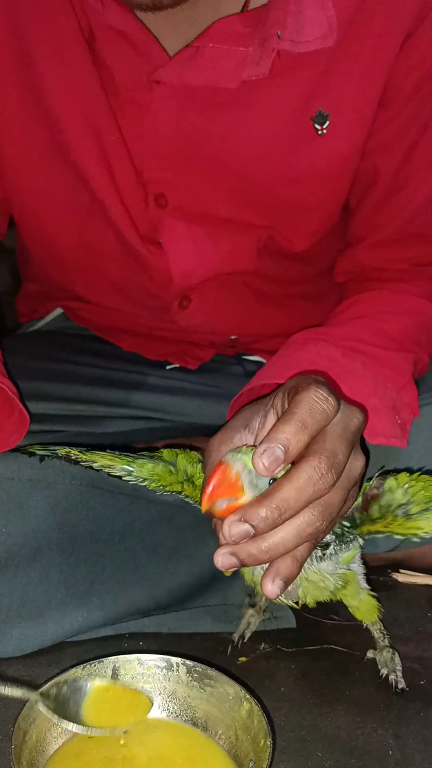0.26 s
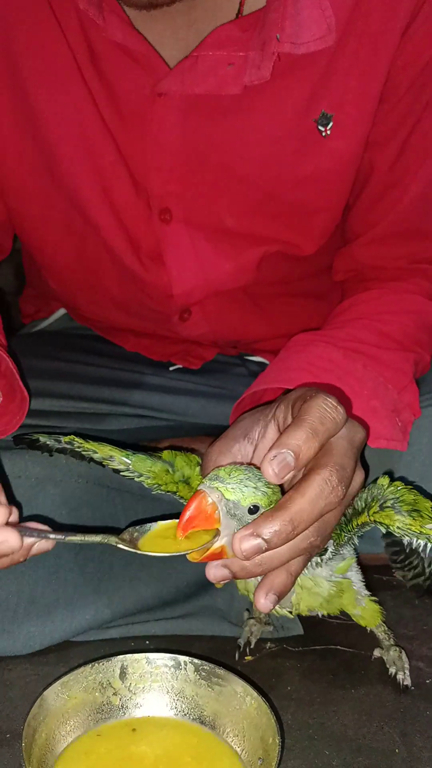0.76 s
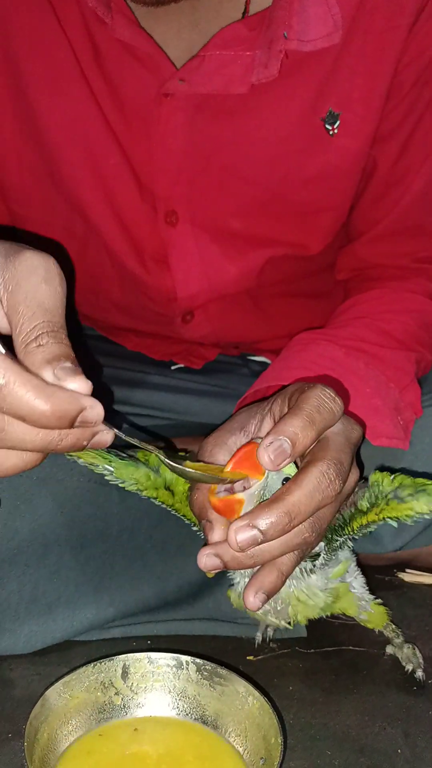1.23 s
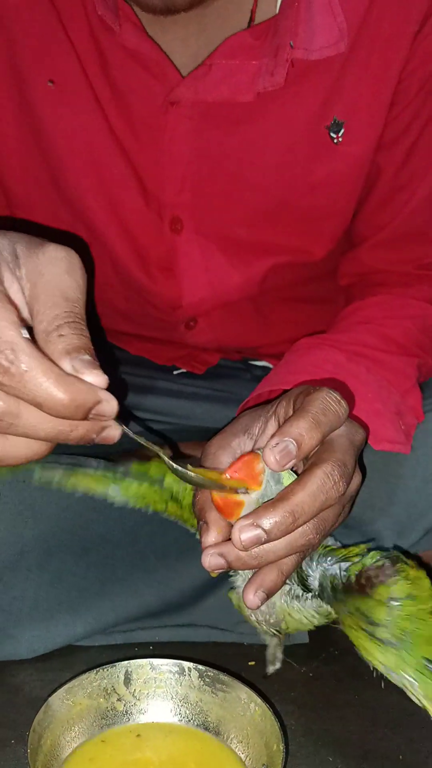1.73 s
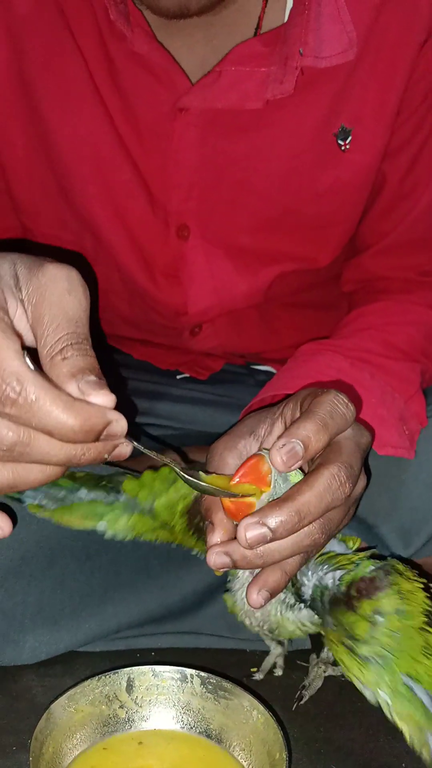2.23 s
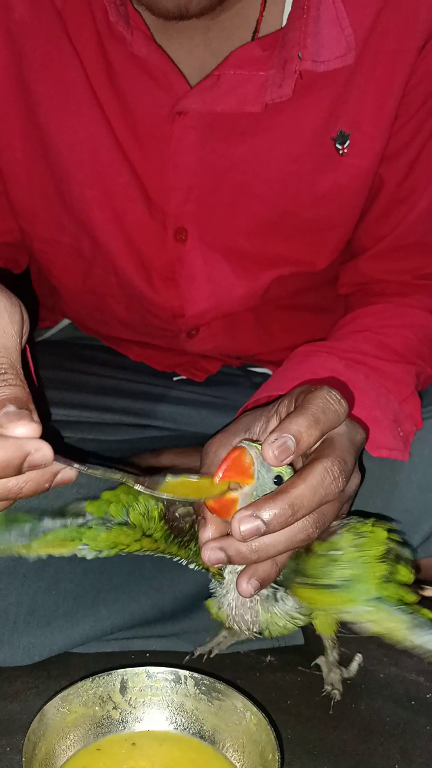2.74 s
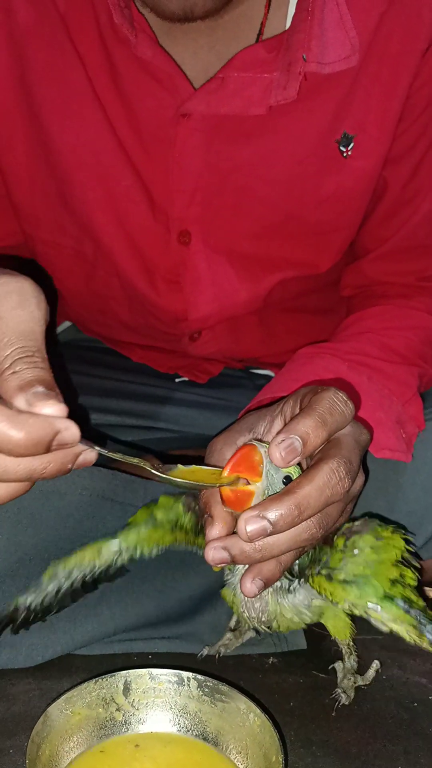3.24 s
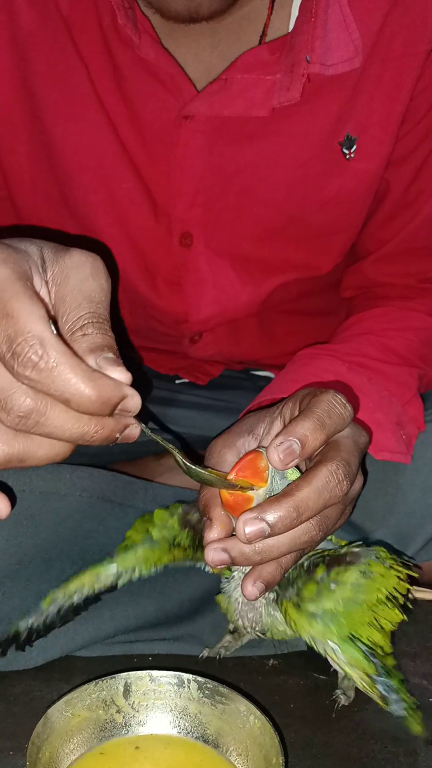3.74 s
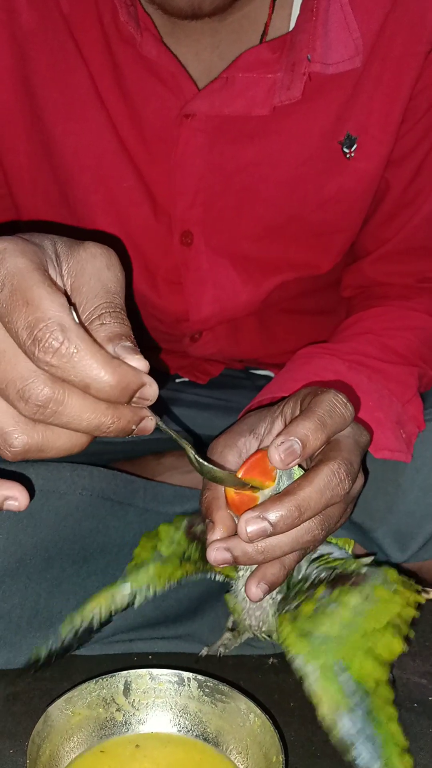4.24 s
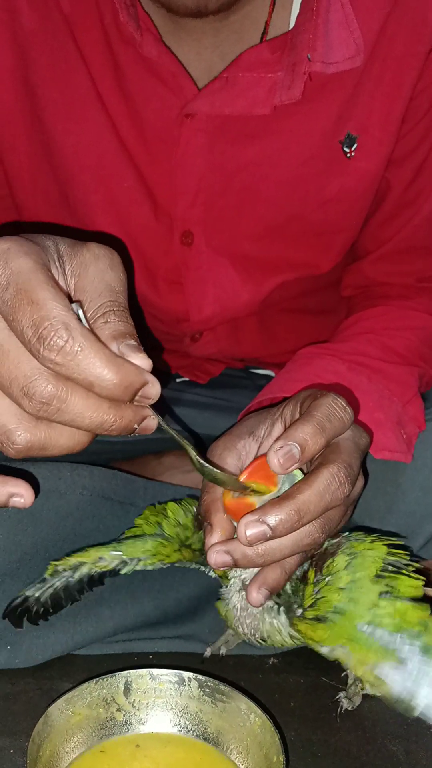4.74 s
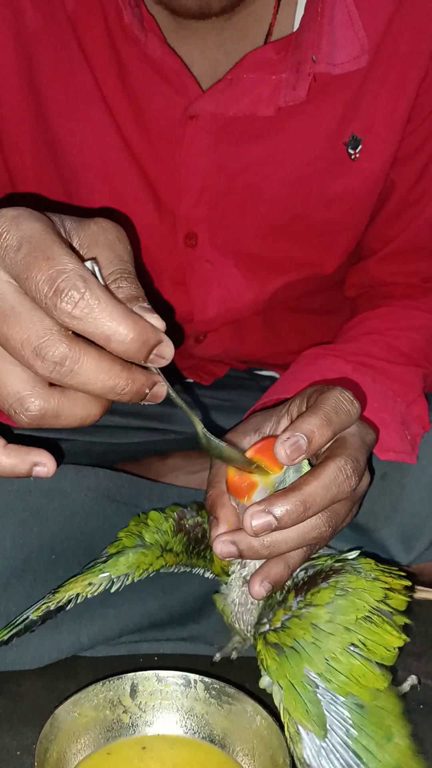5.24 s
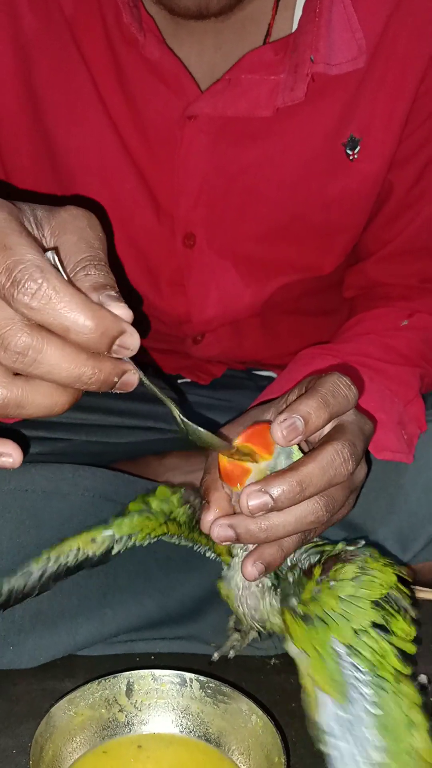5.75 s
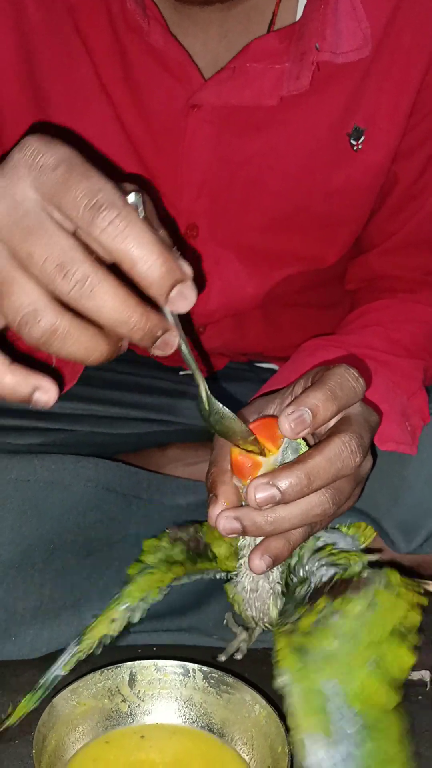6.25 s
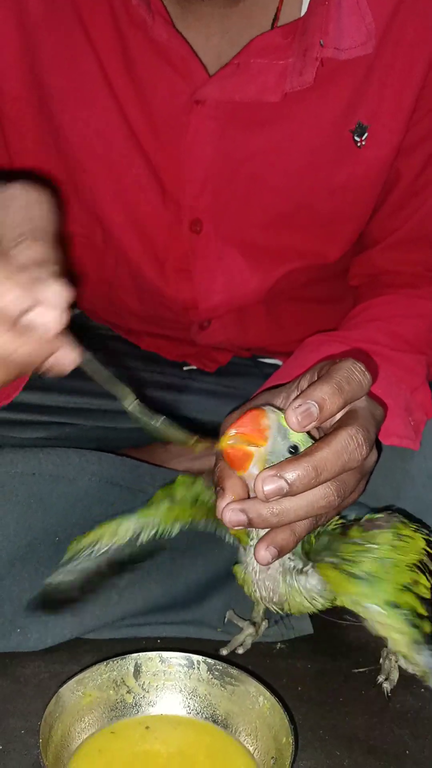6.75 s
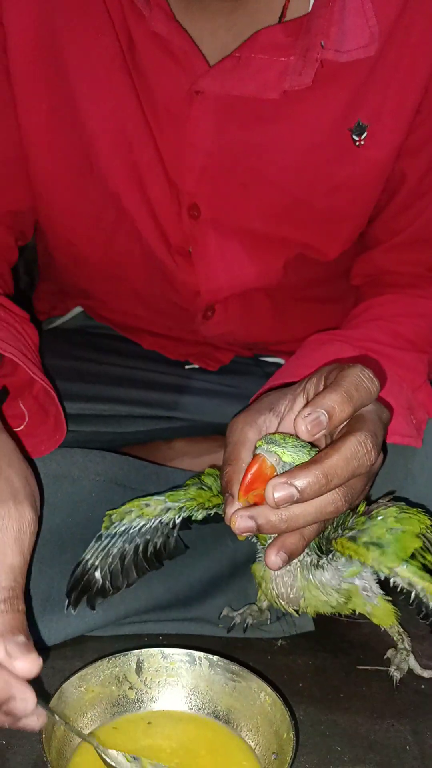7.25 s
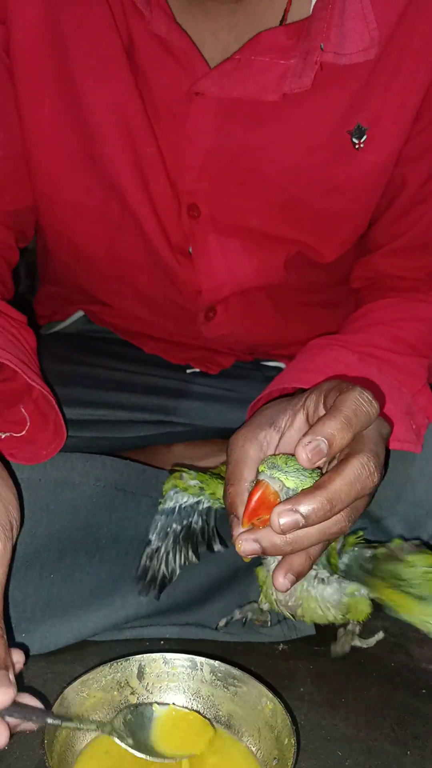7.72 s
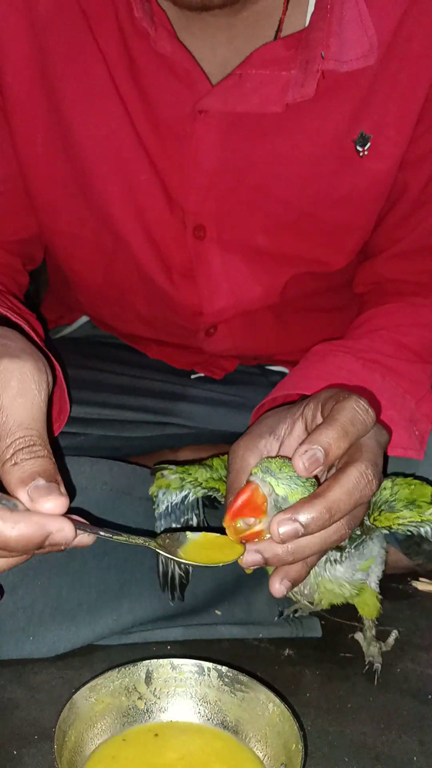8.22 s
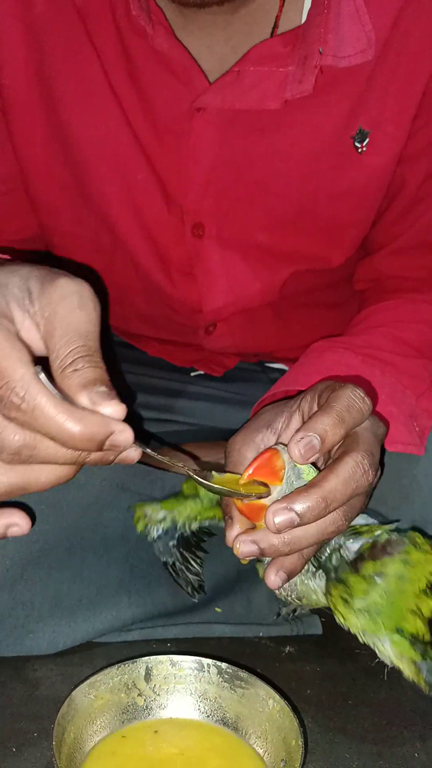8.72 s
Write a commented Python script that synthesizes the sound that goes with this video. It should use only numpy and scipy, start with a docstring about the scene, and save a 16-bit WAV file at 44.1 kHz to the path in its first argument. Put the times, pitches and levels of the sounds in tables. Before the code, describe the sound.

A young parrot gives two harsh begging cries in a quiet room, amid light spoon ticks and soft feather rustling.

```python
"""A parrot chick held in a hand begs twice in a quiet room, close to a stereo microphone.
Its vocal folds buzz, and its throat and beak shape the buzz: first a clear, falling, trembling cry,
then a cry that breaks into a rasp as the folds lose their beat. Around the cries feathers and cloth
rustle, dull taps land on the floor, beak and claws tick, and a spoon rings and scrapes on a bowl.
A low hum, a soft hiss and a few faint faraway tones lie underneath."""
import sys
import numpy as np
from scipy import signal
from scipy.fft import irfft
from scipy.io import wavfile
from scipy.ndimage import uniform_filter1d

SR = 44100
rng = np.random.default_rng(int(sys.argv[2]) if len(sys.argv) > 2 else 0)


def unload_audio(sound):
    """Save the sound as a 16-bit wav file, at the path given as the first command line argument."""
    columns = np.transpose(np.atleast_2d(sound))
    # keep every value between -1 and 1, then stretch to whole-number steps
    steps = np.round(np.clip(columns, -1, 1) * 32767)
    wavfile.write(sys.argv[1], SR, steps.astype(np.int16))


N = 396018


def gain_of(db):
    """Turns decibels into a number to multiply by."""
    return 10 ** (np.asarray(db) / 20)


def evened(x):
    """Scales a signal to an average power of 1."""
    return x / np.sqrt(np.mean(x ** 2) + 1e-20)


def curve_at(points, hz):
    """Joins (freq_hz, value) points with straight lines on an octave scale."""
    point_hz, value = np.transpose(points)
    return np.interp(np.log(hz + 1), np.log(point_hz + 1), value)


def humps(peaks, hz):
    """The boost or cut in dB that resonances give at each frequency."""
    return sum(db / (1 + (2 * (hz - centre) / width) ** 2) for centre, width, db in peaks)


def add(mix, start_s, sound):
    """Adds a sound into the mix at a given time."""
    part = mix[..., round(start_s * SR):][..., :sound.shape[-1]]
    part += sound[..., :part.shape[-1]]


def wander(count, span_s):
    """A smooth random wiggle of size about 1; a longer span makes it slower."""
    memory = np.exp(-1 / (span_s * SR))
    return evened(signal.lfilter([1], [1, -2 * memory, memory ** 2], rng.standard_normal(count)))


# How alike left and right noise are (1 = the same): freq_hz, likeness
LIKENESS = [(60, 0.99), (180, 0.96), (550, -0.017), (1650, 0.21), (4970, -0.15), (15000, -0.4)]
def stereo_noise(shape, peaks, size, patch_db):
    """Shaped noise with random louder and softer patches; left and right agree only in the bass."""
    hop, hz = size // 4, np.fft.rfftfreq(size, 1 / SR)
    draws = rng.standard_normal((N // hop + 5, len(hz), 5), dtype=np.float32)
    a, b, c, d, patches = np.ascontiguousarray(draws.T)
    patches = evened(uniform_filter1d(uniform_filter1d(patches, size=8, axis=0), size=8, axis=1))
    alike = curve_at(LIKENESS, hz)[:, None]
    left = a + 1j * b
    right = alike * left + np.sqrt(1 - alike ** 2) * (c + 1j * d)
    colour_db = curve_at(shape, hz) + humps(peaks, hz)
    spectra = np.array([left, right]) * gain_of(colour_db[:, None] + patch_db * patches)
    return evened(signal.istft(spectra, nperseg=size, noverlap=size - hop)[1][:, :N])


# Tone colour of the room's background: freq_hz, gain_db
AIR_COLOUR = [(12, -33.5), (20, -0.5), (42, -10.5), (98, -1), (276, -23), (335, -13), (407, -17),
              (619, -22), (1280, -30), (3590, -29.5), (5310, -33.5), (6100, -27.5), (6640, -34),
              (14500, -39), (15800, -37)]
# Narrow bands that stand out of it: freq_hz, width_hz, gain_db
AIR_PEAKS = [(24.2, 14, -6.5), (62.4, 10, 10), (98, 12, -1.5), (147, 13, 7.5), (200, 14, 8.5),
             (258, 16, 9.5), (335.8, 19, 13), (6230, 120, 2)]
def room_tone(level_db=-62.5, swell_at_s=2.7, swell_span_s=0.3, swell_db=5):
    """A low hum under a faint hiss; the deepest part swells once."""
    tone = gain_of(level_db) * stereo_noise(AIR_COLOUR, AIR_PEAKS, size=4096, patch_db=1.5)
    deep = signal.sosfiltfilt(signal.butter(4, 85, fs=SR, output="sos"), tone)
    swell = np.exp(-((np.arange(N) / SR - swell_at_s) / swell_span_s) ** 2)
    return tone + deep * (gain_of(swell_db * swell) - 1)


def rustle(moves, shape, peaks, rest_db, rise_share, flicker_db):
    """Flickering noise that swells with each move; it rises in rise_share times the fade time."""
    t = np.arange(0, N / SR + .01, .002)
    power = gain_of(2 * rest_db)
    for peak_s, fade_s, db in moves:
        span_s = fade_s * np.where(t < peak_s, rise_share, 1)
        power = power + gain_of(2 * db) * np.exp(-((t - peak_s) / span_s) ** 2)
    level_db = np.interp(np.arange(N) / SR, t, 10 * np.log10(power)) + flicker_db * wander(N, .005)
    return gain_of(level_db) * stereo_noise(shape, peaks, size=512, patch_db=2.5)


# Single moves of feathers, cloth and body: peak_s, fade_s, level_db
SWISHES = [(0.02, 0.061, -55.5), (0.073, 0.021, -61), (0.75, .2, -75), (0.96, 0.054, -69.5),
           (1.49, 0.064, -65.5), (1.618, 0.045, -66), (1.72, 0.03, -65.5), (1.839, 0.039, -63.5),
           (1.95, .25, -76), (1.96, 0.091, -67.5), (2.1, 0.05, -64), (2.87, 0.16, -67), (3.17, 0.1, -69),
           (3.55, .2, -82), (3.83, 0.24, -70.5), (3.99, 0.04, -68.5), (4.32, 0.057, -65.5), (4.55, .1, -68),
           (4.85, .15, -70.5), (5.1, 0.21, -70.5), (6.339, 0.054, -73), (6.69, .03, -74),
           (6.825, 0.057, -72.5), (7.15, 0.038, -91), (7.43, .09, -84), (7.72, 0.041, -68),
           (7.95, .15, -71.5), (8.34, .025, -78), (8.85, 0.044, -71), (8.975, 0.026, -74)]
RUBS = [(0.07, 0.02, -63), (0.65, 0.36, -68), (0.94, 0.081, -58.5), (1.84, 0.028, -72), (1.95, 0.081, -69),
        (3.8, 0.058, -74), (4.689, 0.083, -62.5), (6.62, .04, -77), (6.82, 0.033, -79),
        (8.341, 0.018, -67.5), (8.82, 0.017, -74), (8.97, 0.027, -75)]
BUMPS = [(0.05, 0.18, -65), (0.96, 0.17, -69), (1.84, 0.02, -67.5), (2.92, 0.034, -69), (4.0, 0.066, -68),
         (4.73, .09, -57.5), (6.85, .03, -82)]
# Tone colour of each kind of move: freq_hz, gain_db
FEATHER_COLOUR = [(900, -10.5), (2000, -9), (4000, -4), (6500, -4.5), (9000, -6), (11000, -18.5),
                  (15800, -12.5)]
CLOTH_COLOUR = [(250, -18.5), (450, 0.5), (750, -3), (1300, -10.5), (2500, -18.5), (4000, -40.5)]
BUMP_COLOUR = [(70, -12.5), (120, 0), (180, 3), (280, -11), (420, -35)]
# Resonances that make the rub sound hollow: freq_hz, width_hz, gain_db
CLOTH_PEAKS = [(450, 130, 3), (680, 80, 5), (1050, 90, 4)]
def movements():
    """Wing feathers swish, cloth rubs, and the chick's body bumps the lap."""
    feathers = rustle(SWISHES, FEATHER_COLOUR, (), rest_db=-83, rise_share=.82, flicker_db=2.5)
    cloth = rustle(RUBS, CLOTH_COLOUR, CLOTH_PEAKS, rest_db=-83.5, rise_share=.12, flicker_db=2.5)
    lap = rustle(BUMPS, BUMP_COLOUR, (), rest_db=-73, rise_share=.6, flicker_db=1.5)
    return feathers + cloth + lap


# Faint tones from afar: start_s, length_s, pitch_hz, level_db, waver_share (of the pitch)
FAR_TONES = [(0.08, .3, 440, -71, .01), (7.58, .45, 830, -80, .01), (7.66, .27, 4600, -74, .008)]
def far_tones():
    """Pure tones that fade in and out while their pitch wavers."""
    out, t = np.zeros(N), np.arange(SR // 2) / SR
    for start_s, length_s, hz, db, waver in FAR_TONES:
        progress = np.clip(t / length_s, 0, 1)
        cycles = np.cumsum(hz * (1 + waver * np.cos(3 * np.pi * progress))) / SR
        loudness = gain_of(db + 3 * wander(len(t), .012)) * np.sin(np.pi * progress)
        add(out, start_s, loudness * np.sin(2 * np.pi * cycles))
    return out


# Dull taps on the floor: start_s, level_db, pitch_hz
THUDS = [(0.9283, -62, 1050), (1.7294, -47, 454), (3.885, -59.5, 800), (4.581, -57.5, 990),
         (4.64, -57, 1010), (4.7002, -51.5, 757)]
def thuds(decay_s=0.029, snap_db=-10):
    """Each tap is a short tone plus a snap of noise. A decay_s is always the time to fall by 60 dB."""
    out, t = np.zeros((2, N)), np.arange(2500) / SR
    onset = np.clip(t / .0003, 0, 1)
    for start_s, db, hz in THUDS:
        snap = gain_of(snap_db - 60 * t / decay_s) * rng.standard_normal((2, len(t)))
        add(out, start_s, gain_of(db - 60 * t / decay_s) * onset * (np.sin(2 * np.pi * hz * t) + snap))
    return out


def pan(left_db):
    """Left and right gains that make the left side louder by left_db."""
    return gain_of([[left_db / 2], [-left_db / 2]])


# Beak, claw and spoon ticks: start_s, level_db, ring_hz, knock_db, left_db
TICKS = [(1.1483, -61, 2280, -56.5, 1), (1.8457, -52.5, 2220, -70, 8), (2.8244, -45.5, 2875, -50.5, -1),
         (3.104, -45.5, 5000, -63, -7), (3.6007, -61.5, 6850, -72, -10), (3.8015, -51.5, 4130, -50.5, -4),
         (4.2403, -56, 5060, -70, -1.5), (4.3161, -55, 8160, -80, 3), (4.5136, -54, 2450, -80, -2),
         (4.9589, -57, 2900, -58.5, 2), (5.1551, -47, 2870, -50, 6), (6.078, -49, 2507, -53, 1),
         (6.1665, -51, 3620, -75, -5), (6.332, -58.5, 3490, -65, -10), (6.5949, -54, 2410, -68, 1),
         (6.6141, -51.5, 3130, -55.5, -4.5), (6.781, -61, 7750, -55.5, -2), (6.8219, -71, 7600, -72, 4.5),
         (7.1382, -48.5, 2420, -62, 7.5), (7.4046, -59, 2290, -62, 6), (7.5662, -65, 2490, -68, 10),
         (8.1842, -53.5, 3980, -60, -1), (8.319, -58, 4020, -68, -1.5), (8.3391, -45, 3900, -50, -5),
         (8.5048, -54.5, 3870, -77, -3.5), (8.8158, -49.5, 3650, -51, -4.5), (8.97, -64, 3340, -58, 1)]
# The lower notes that ring under each tick: pitch_hz, gain_db, decay_s
KNOCK_NOTES = [(717, -11, 0.035), (1010, 0, 0.0073), (1380, -3, .018), (1760, -4.5, 0.02)]
def ticks(crack_decay_s=0.0082, ring_decay_s=.006):
    """Hard things touch: a gritty crack, a high ring that dies fast, and a lower knock."""
    out, t = np.zeros((2, N)), np.arange(2500) / SR
    onset = np.clip(t / .0003, 0, 1)
    knock = onset * sum(gain_of(db - 60 * t / decay_s) * np.sin(2 * np.pi * hz * t)
                        for hz, db, decay_s in KNOCK_NOTES)
    for start_s, db, ring_hz, knock_db, left_db in TICKS:
        band = signal.butter(2, [.55 * ring_hz, 1.9 * ring_hz], "bandpass", fs=SR)
        burst = rng.standard_normal((2, len(t))) * gain_of(-60 * t / crack_decay_s)
        crack = signal.lfilter(*band, burst)
        ring = onset * np.sin(2 * np.pi * ring_hz * t) * gain_of(-60 * t / ring_decay_s)
        tick = gain_of(db) * (1.44 * ring + 1.2 * crack) + gain_of(knock_db) * knock
        add(out, start_s, tick * pan(left_db))
    return out


def through_throat(buzz, shape, peaks):
    """Throat and beak colour the buzz; the result has an average power of 1."""
    hz = np.fft.rfftfreq(4096, 1 / SR)
    db = curve_at(shape, hz) + humps(peaks, hz)
    log_gain = np.log(gain_of(np.r_[db, db[-2:0:-1]]))
    # The quickest-dying filter that has this tone colour.
    response = np.fft.ifft(np.exp(np.conj(signal.hilbert(log_gain)))).real[:1024]
    return evened(signal.oaconvolve(buzz, response)[:len(buzz)])


# The clear voice, one list per cry: time_s, effort_db, pitch_hz, tremor_share (of the pitch), breath_db
CRIES = [
    [(2.174, -36, 958, 0.00069, -20), (2.2, -31, 1115, 0.00091, -10.5), (2.235, -29.5, 1146, 0.0023, -23.5),
     (2.264, -27.5, 1125, 0.003, -19), (2.272, -27, 1129, 0.0024, -28.5), (2.281, -23, 1116, 0.0019, -36),
     (2.292, -28, 1050, 0.015, -36), (2.37, -32.5, 987, 0.04, -25), (2.5, -34, 904.4, 0.042, -19.5),
     (2.6, -35, 889.7, 0.023, -15.5), (2.69, -39, 845, 0.013, -23.5), (2.735, -39.5, 811.4, 0.002, -25.5),
     (2.762, -34.5, 750, 0.0013, -28), (2.775, -37, 680, 0.00089, -26.5), (2.789, -43.5, 570, 0.0012, -11)],
    [(5.17, -38.5, 1338, 0.0044, -8.5), (5.185, -35, 1319, 0.015, -4), (5.191, -30, 1288, 0.032, -21),
     (5.24, -28, 1210, 0.046, -16), (5.256, -28, 1090, 0.086, -4), (5.283, -28, 1100, 0.075, -10),
     (5.295, -36, 1052, 0.05, 3.5), (5.311, -26, 1045, 0.062, -3), (5.325, -49.5, 970, 0.04, -5)],
]
# Tone colour set by the beak's pose, one list per cry: freq_hz, gain_db
CRY_COLOURS = [
    [(350, -51.5), (600, -2), (850, -4), (1200, -8.5), (1800, -4), (2500, -3), (3250, 0.5), (4000, -1),
     (5100, -11.5), (6500, -13), (7900, -24), (8800, -43), (10500, -19), (12500, -47), (15300, -31)],
    [(500, -45), (1000, -12.5), (1300, -7.5), (2400, -10), (3100, 1.5), (3700, 0), (4600, -9.5),
     (6200, -13.5), (7000, -26), (8800, -18.5), (10000, -35), (15800, -49)],
]
# The tremble, one row per cry: crest_s, rate_hz (at that crest), slowing_hz_per_s
TREMORS = [(2.343, 26.7, 7.0), (5.208, 29, -60)]
# Resonances that lift or dip any passing harmonic: freq_hz, width_hz, gain_db
CRY_PEAKS = [(3130, 200, 3.5), (3900, 400, -2.5), (3376, 44, 4), (5150, 550, -4), (6140, 310, 5.5)]
# Resonances that lift only the lowest harmonic: freq_hz, width_hz, gain_db
LOWEST_PEAKS = [(845, 79, 13), (1136.5, 45, 9.9), (1280, 160, 3)]
# Moments when the voice snags into noise: time_s, span_s, breath_db
SNAGS = [(2.563, .008, 2), (2.602, .003, 1), (2.678, .004, -4)]
LOWEST_DB = (-5, -2.5)  # gain of the lowest harmonic in each cry
def cry(rows, shape, tremor, lowest_db, flutter_db=1.45):
    """The vocal folds beat evenly on a trembling pitch and let out a puff of breath each cycle."""
    times, *columns = np.transpose(rows)
    t = np.arange(times[0], times[-1], 1 / SR)
    effort_db, hz, depth, breath_db = (np.interp(t, times, column) for column in columns)
    crest_s, rate_hz, slowing = tremor
    trembles = rate_hz * (t - crest_s) - slowing * (t - crest_s) ** 2 / 2
    hz = hz * (1 + depth * np.cos(2 * np.pi * trembles) + .006 * wander(len(t), .002))
    cycles = np.cumsum(hz) / SR
    lowest_db = lowest_db + humps(LOWEST_PEAKS, hz)
    db_per_octave = -0.52 + .15 * (effort_db + 30.5)  # a weaker cry is duller
    folds = np.zeros(len(t))
    for k in range(1, 19):  # harmonic k sounds at k times the pitch; high ones flutter most
        db = db_per_octave * np.log2(k) + (k == 1) * lowest_db
        db += flutter_db * np.sqrt(k) * wander(len(t), .0025)
        folds += gain_of(db) * (k * hz < SR / 2) * np.cos(2 * np.pi * k * cycles)
    snags = sum(gain_of(db) * np.exp(-((t - at_s) / span_s) ** 2) for at_s, span_s, db in SNAGS)
    puffs = 0.44 + np.exp(-(cycles % 1) / 0.11)
    hiss = np.diff(rng.standard_normal(len(t) + 1))
    breath = (gain_of(breath_db) + snags) * evened(puffs * hiss)
    voice = through_throat(evened(folds) + breath, shape, CRY_PEAKS)
    return times[0], gain_of(effort_db) * voice * signal.windows.tukey(len(t), .02)


# Thin rings of spoon and bowl: start_s, pitch_hz, level_db, swell_s, decay_s
RINGS = [(3.25, 4590, -80, .03, .4), (6.77, 7760, -69, .02, .6), (7.15, 3655, -77, .01, .45)]
def spoon_rings():
    """Spoon or bowl rings on one high note that swells, flickers and dies away."""
    out, t = np.zeros(N), np.arange(SR // 2) / SR
    for start_s, hz, db, swell_s, decay_s in RINGS:
        swell = np.clip(t / swell_s, 0, 1) ** 2
        fade = gain_of(db - 60 * t / decay_s + 2 * wander(len(t), 0.01))
        add(out, start_s, swell * fade * np.sin(2 * np.pi * hz * t))
    return out


# The rasp that ends the second cry: time_s, effort_db, pair_hz (pairs of pulses per second)
RASP = [(5.249, -23, 801), (5.309, -29, 776), (5.369, -31, 765.8), (5.41, -30.5, 812.2),
        (5.47, -29.5, 776.6), (5.519, -31, 827), (5.701, -31, 739), (5.821, -31, 839.6), (5.846, -32, 741),
        (5.955, -31, 805.6), (5.975, -31, 705.6), (5.984, -26.5, 607.6), (5.996, -54, 550)]
# The four uneven pulses of a group: gain_db
GROUP_DB = [2, -4, 0.5, -9]
# Tone colour set by the beak's pose in the rasp: freq_hz, gain_db
RASP_COLOUR = [(200, -51.5), (300, -24.5), (420, -9.5), (600, -16), (780, -8.5), (1000, -11), (1550, -12),
               (2150, -9), (3150, -5), (4400, -5), (5150, -15), (7600, -19), (10500, -30.5), (14200, -38),
               (15300, -61.5)]
# Throat resonances in the rasp: freq_hz, width_hz, gain_db
RASP_PEAKS = [(1137, 69, 9.5), (1560, 260, 4), (3196, 215, 10.5), (3595, 230, 6), (4590, 500, -1),
              (5230, 320, -6.5), (6260, 640, 3), (7550, 310, 5), (9380, 210, 2)]
# The undertone, the part that stays in step: multiple (of pair_hz), gain_db
UNDERTONES = [(1, 0), (2, -8), (4, -8)]
def rasp(jitter=0.14, wobble=.03, spread_db=2.5, hiss_db=-8, under_db=-10):
    """The folds lose their beat: pulses uneven in size and timing, over a wavering undertone."""
    times, efforts, rates = np.transpose(RASP)
    t = np.arange(times[0], times[-1], 1 / SR)
    effort_db, pair_hz = np.interp(t, times, efforts), np.interp(t, times, rates)
    pairs = np.cumsum(pair_hz * (1 + wobble * wander(len(t), .004))) / SR
    index = np.arange(1, int(2 * pairs[-1]))
    slip, size = rng.standard_normal((2000, 2)).T[:, :len(index)]
    pulse_at = np.interp(index + jitter * slip, 2 * pairs, np.arange(len(t)))
    pulse_db = np.take(GROUP_DB, index, mode="wrap") + spread_db * size
    pulses = np.zeros(len(t))
    np.add.at(pulses, np.round(pulse_at).astype(int), gain_of(pulse_db))
    buzz = evened(pulses - pulses.mean()) + gain_of(hiss_db) * rng.standard_normal(len(t))
    voice = through_throat(buzz, RASP_COLOUR, RASP_PEAKS)
    undertone = sum(gain_of(db + 2.5 * wander(len(t), .003)) * np.sin(2 * np.pi * k * pairs)
                    for k, db in UNDERTONES)
    settle_db = -95 * np.maximum(times[0] + .16 - t, 0)  # the undertone grows for the first 0.16 s
    ending_db = -4.5 * (pair_hz < min(rates[:-3]))  # and weakens in the last drop of pitch
    undertone *= gain_of(under_db + settle_db + ending_db)
    fade_in = np.clip((t - times[0]) / 0.086, 0, 1)  # takes over from the clear voice
    fade_out = np.clip((times[-1] - t) / 0.013, 0, 1)
    return times[0], fade_in * fade_out * gain_of(effort_db) * (voice + undertone)


# The spoon drags on the bowl: start_s, level_db, centre_hz, decay_s
SCRAPES = [(6.822, -53, 4500, 0.069), (7.139, -57.5, 2800, .12), (7.405, -62, 2750, 0.21)]
def spoon_scrapes():
    """Metal drags on metal in short bursts of gritty noise."""
    out, t = np.zeros((2, N)), np.arange(6000) / SR
    for start_s, db, hz, decay_s in SCRAPES:
        grit = rng.standard_normal((2, len(t))) * gain_of(4.1 * wander(len(t), 0.0014))
        band = signal.butter(2, [.45 * hz, 2 * hz], "bandpass", fs=SR)
        add(out, start_s, evened(signal.lfilter(*band, grit)) * gain_of(db - 60 * t / decay_s))
    return out


# The microphone's body shades its two openings: freq_hz, left_db (left over right)
SHADE = [(300, -0.5), (950, -3), (1400, 6.5), (1950, 4.5), (2200, -3.5), (2900, 2), (3700, -10.5),
         (4400, 3.5), (5200, -2.5), (5800, -6), (6800, -3), (7500, 13), (9000, 9.5), (11000, -0.5),
         (15000, -5)]
# How far the left side's wave runs ahead of the right: freq_hz, lead_radians
LEFT_LEAD = [(100, 1), (600, 0.12), (1210, 1.5), (2300, 1.66), (3190, 1.17), (3960, 4), (5500, 4),
             (7240, 5.5), (9500, 8.5), (12500, 13.5), (15500, 14)]
# Echoes off floor, bowl and lap: left_delay_s, right_delay_s, gain_db
ECHOES = [(.0011, .0016, -23.5), (.0027, .0021, -14), (.0041, .0052, -12), (.0073, .0063, -20)]
def to_microphone(voice, margin=88):
    """The voice reaches each side of the microphone directly and by a few close echoes."""
    hz = np.fft.rfftfreq(4096, 1 / SR)
    delay = np.exp(-2j * np.pi * hz * margin / SR)  # spare samples so that one side can arrive early
    paths = []
    for channel, side in enumerate((1, -1)):
        direct = np.exp(1j * side * curve_at(LEFT_LEAD, hz) / 2)
        echoes = sum(gain_of(db) * np.exp(-2j * np.pi * hz * delays[channel]) for *delays, db in ECHOES)
        paths.append(gain_of(side * curve_at(SHADE, hz) / 2) * (direct + echoes) * delay)
    return signal.oaconvolve(voice[None], irfft(np.array(paths), axis=1), axes=1)[:, margin:N + margin]


# How long the room keeps sounding: freq_hz, decay_s
ROOM_DECAY = [(300, 0.11), (1300, 0.23), (3500, .2), (9000, 0.2)]
def room_reverb(sound):
    """Many small random echoes blur into a tail; each frequency dies at its own speed."""
    echoes = np.zeros((2, SR // 2))
    slots = np.arange(300, SR // 2 - 20, 20)
    echo_at = slots + rng.integers(0, 20, (2, len(slots)))
    np.put_along_axis(echoes, echo_at, rng.choice([-1., 1.], echo_at.shape), 1)
    hz, t, spectra = signal.stft(echoes, SR, nperseg=256)
    fade = gain_of(-60 * t / curve_at(ROOM_DECAY, hz)[:, None])
    tail = signal.istft(spectra * fade, SR, nperseg=256)[1]
    return signal.oaconvolve(sound, tail / np.linalg.norm(tail[0]), axes=1)[:, :N]


def scene(reverb_db=-9):
    """The chick, taps, ticks and scrapes echo in the room; the other sounds are added without echo."""
    chick = np.zeros(N)
    for settings in zip(CRIES, CRY_COLOURS, TREMORS, LOWEST_DB):
        add(chick, *cry(*settings))
    add(chick, *rasp())
    chick = to_microphone(chick)
    touches = thuds() + ticks() + spoon_scrapes()
    reverb = gain_of(reverb_db) * room_reverb(chick + gain_of(-0.5) * touches)
    thin_tones = (far_tones() + spoon_rings()) * pan(left_db=3)
    background = (room_tone() + movements()) * pan(left_db=-1.3)
    return chick + touches + reverb + thin_tones + background


def record(dry):
    """Cuts away the very highest treble."""
    lowpass = signal.firwin(511, cutoff=15760, window=("kaiser", 9), fs=SR)
    return signal.oaconvolve(dry, lowpass[None], "same")


dry = scene()
out = record(dry)
unload_audio(out)
```